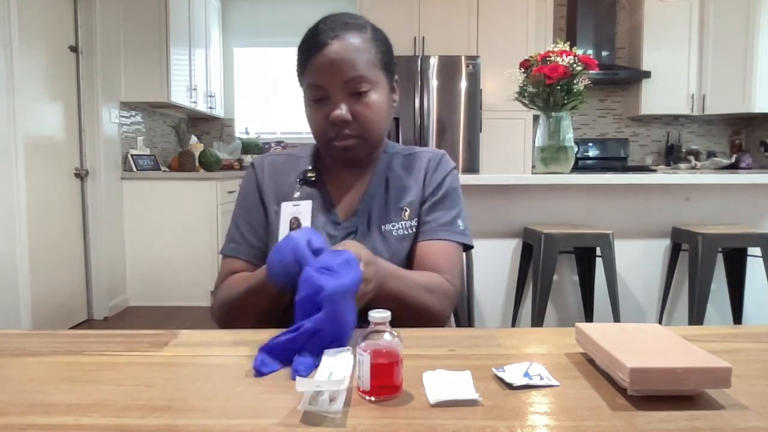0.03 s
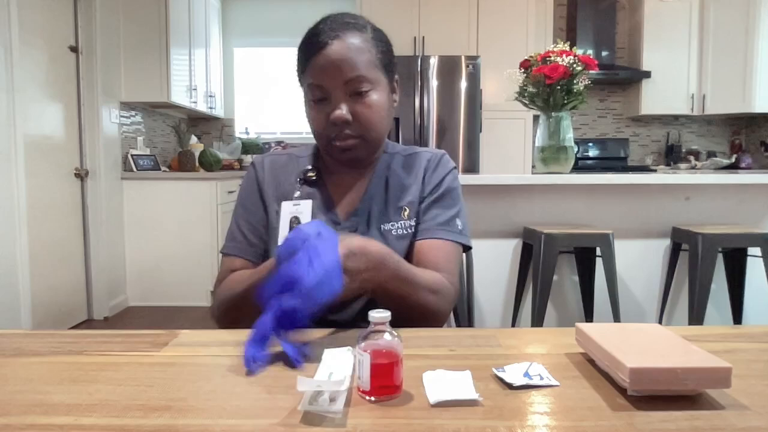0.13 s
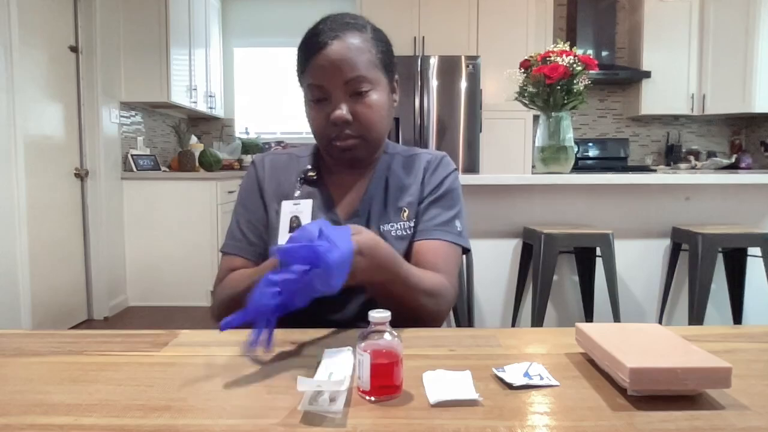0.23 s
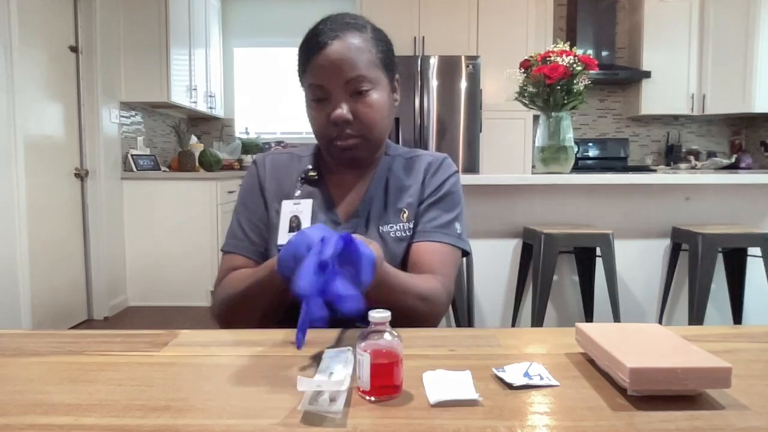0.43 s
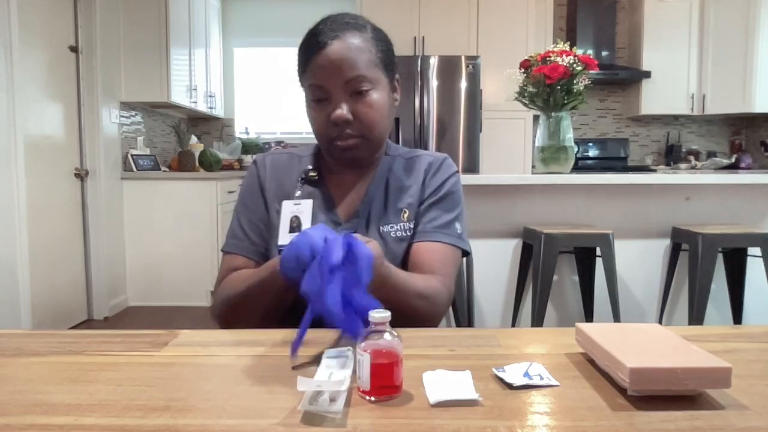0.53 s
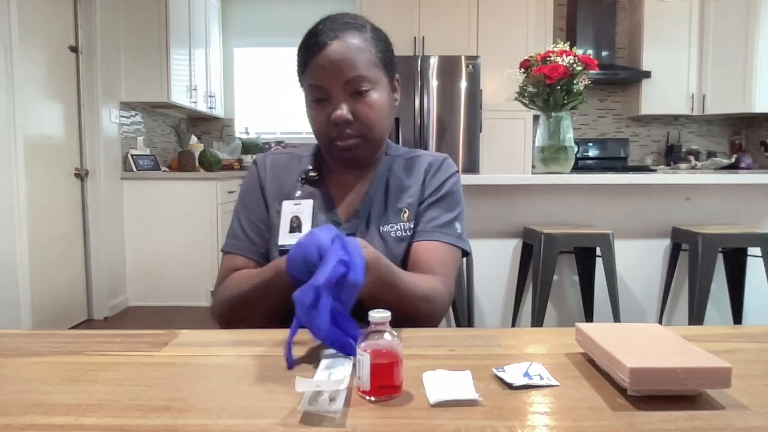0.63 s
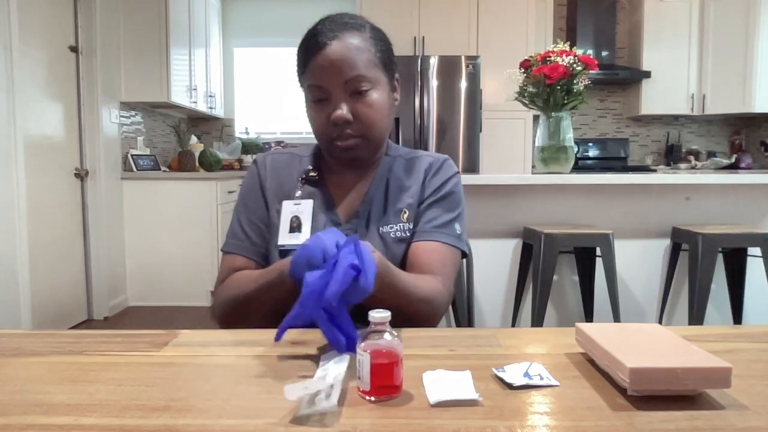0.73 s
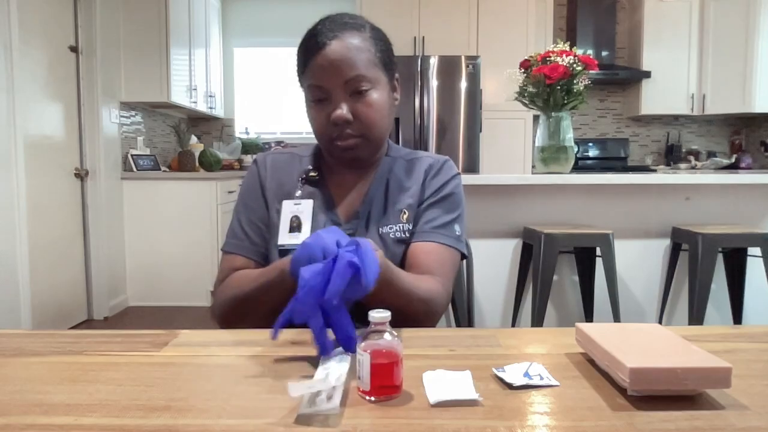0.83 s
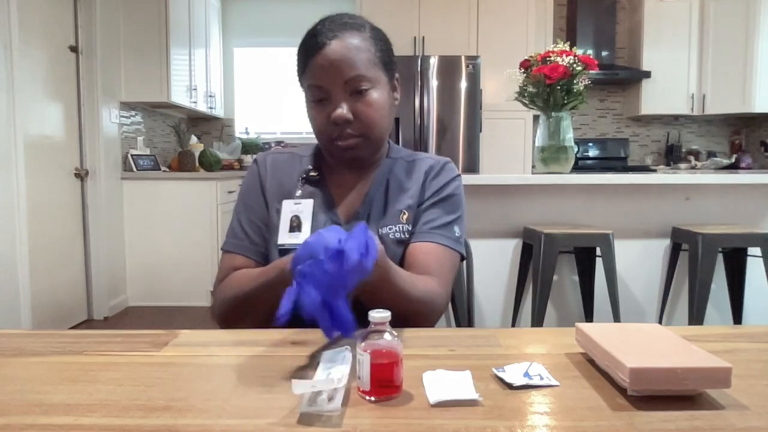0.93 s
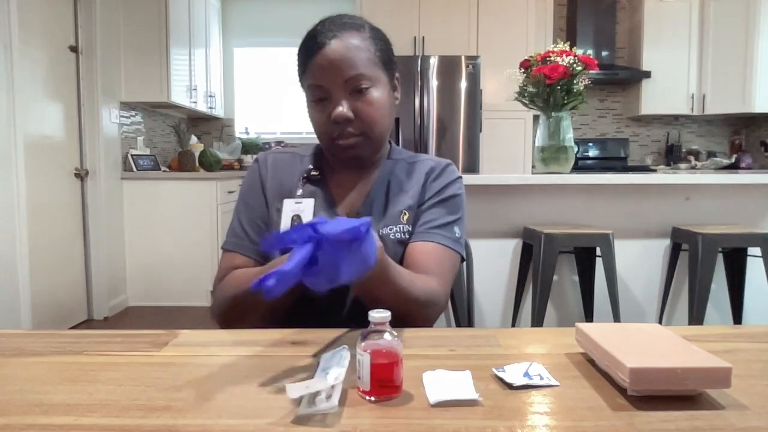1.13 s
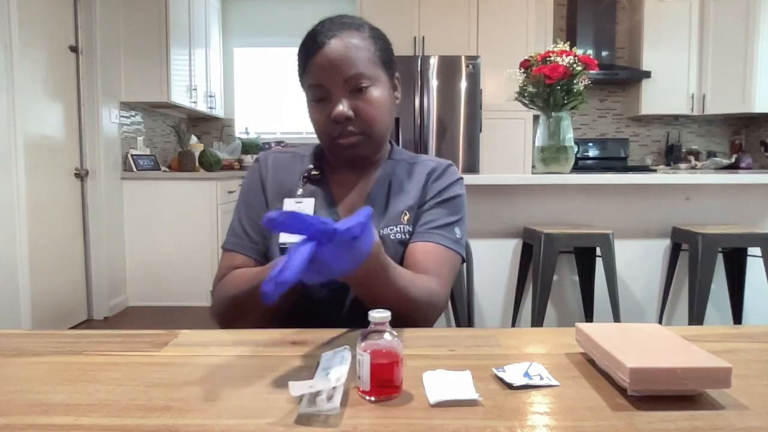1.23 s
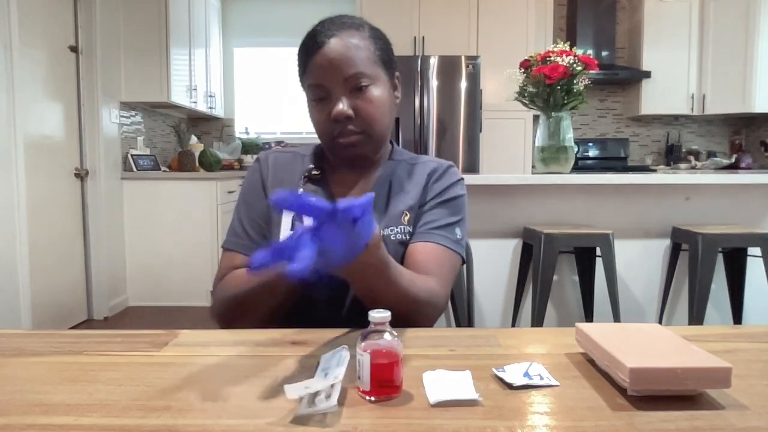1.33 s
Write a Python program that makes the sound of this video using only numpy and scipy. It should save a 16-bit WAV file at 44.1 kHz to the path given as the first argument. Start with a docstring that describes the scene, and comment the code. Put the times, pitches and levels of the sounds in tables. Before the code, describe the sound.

A thin rubber glove rustles onto a hand, with one sharp snap of the cuff.

```python
"""Thin rubber rasps on skin as a glove is worked onto a hand, over a wooden table in a quiet kitchen.
Stick-slip friction drives the film in short strokes; creases tick as they let go, taut film squeaks,
and the loose, hollow glove gives soft low flaps. The cuff snaps once against the wrist and sets the
room reverberating. A faint hum lies under it all, and a noise suppressor dulls the quiet moments."""
import sys
import numpy as np
from scipy import signal
from scipy.fft import rfft, irfft
from scipy.io import wavfile
from scipy.ndimage import uniform_filter1d

SR = 44100
rng = np.random.default_rng(int(sys.argv[2]) if len(sys.argv) > 2 else 0)


def bounce(signal):
    """Save signal as a 16-bit WAV file at the path given by the first command-line argument."""
    frames = np.transpose(np.atleast_2d(signal))
    limited = np.clip(frames, -1, 1)
    pcm = np.round(limited * 32767).astype(np.int16)
    wavfile.write(sys.argv[1], SR, pcm)


N = 61739
T, HZ = np.arange(N) / SR, np.fft.rfftfreq(N, 1 / SR)

# rubbing strokes: full_at_s, rise_s, hold_s, fall_s, level_db, body_db, ring_db, fizz_db
# (the last three relative to level_db)
RUB_STROKES = [ (.006, 0.036, 0.0094, 0.041, -59.5, -3, 0, -18),
               (0.032, 0.013, 0.0063, 0.39, -66.5, 0, 0, -11),
               (0.201, 0.027, 0.022, .02, -73.5, -5.5, -2, -1.5),
               (0.223, 0.0021, 0.045, 0.083, -55.5, 0, 0, -10.5),
               (0.284, 0.022, 0.024, 0.11, -56, 2, -3, -33),
               (0.372, 0.017, 0.021, 0.16, -64, -10.5, -3, -5.5),
               (0.538, 0.022, 0.0092, 0.045, -74, 3, 10.5, -24),
               (0.551, 0.017, 0.0059, 0.027, -82.5, 9.5, -10, 6),
               (0.654, 0.045, 0.028, 0.028, -88, 1, 12, -12),
               (0.702, 0.022, 0.044, 0.013, -61.5, -13.5, -8, -5.5),
               (0.766, 0.075, 0.11, 0.14, -66, -8.5, -5, -8.5),
               (0.992, 0.017, 0.025, 0.017, -73.5, -2.5, 18, -13),
               (1.005, 0.015, 0.031, 0.055, -57, -10.5, -6.5, -7),
               (1.082, 0.027, 0.031, 0.068, -87, 9, 14, 7.5),
               (1.184, 0.016, 0.047, 0.042, -74, -12, -5.5, 0.5),
               (1.259, 0.061, 0.032, 0.094, -88, 14.5, 15, -26),
               (1.345, 0.046, 0.023, 0.093, -68.5, -2, 8.5, -6.5)]
# low, middle and high spectra of the rubbed film: frequency_hz, gain_db
BODY_SPECTRUM = [(60, -35), (250, -16), (430, 8), (620, 7.5), (850, 3.5), (1250, 3), (1600, -5),
                 (2400, -59), (6000, -75.5)]
RASP_SPECTRUM = [(600, -50), (1600, -16), (2400, 0), (2700, -11.5), (3050, 4.5), (3400, -0.5), (3780, 4),
                 (4080, -7), (4450, 6.5), (4850, 3), (5400, -3), (6200, -2), (6800, -4), (7400, -24),
                 (12000, -55.5)]
FIZZ_SPECTRUM = [(2000, -64), (6000, -20.5), (7500, 3.5), (9500, 4), (11000, 7), (12500, 5), (15500, 4)]
# creases letting go: start_s, length_s, level_db, tilt_db_per_octave, cutoff_hz, fold_pitch_hz
CREASE_TICKS = [(.0096, 0.0039, -50.5, 2, 5360, 4800), (.163, 0.0036, -57, 10.5, 11000, 6200),
                (0.2257, 0.0025, -44.5, -7, 6030, 900), (0.2623, 0.002, -43.5, -1.5, 12000, 3130),
                (0.381, 0.0014, -39.5, -0.5, 8000, 6240), (0.3968, 0.0017, -44, 4, 6200, 2420),
                (0.5421, 0.0031, -54, -5, 6500, 1317), (0.6945, 0.0033, -50.5, 3.5, 9660, 1800),
                (.7190, 0.0047, -45, 0.5, 11900, 3800), (0.7211, 0.0037, -46.5, 4.5, 12100, 1960),
                (.7394, 0.0023, -44.5, -4, 5000, 1380), (0.845, 0.0034, -63.5, 6, 13700, 11400),
                (1.3532, 0.00026, -35, 1, 4600, 2490)]
# spectrum of a crease: frequency_hz, gain_db
CREASE_SPECTRUM = [(100, -20.5), (700, -8), (1500, -7.5), (2150, 11.5), (2750, -5), (3600, 1), (4050, -3.5),
                   (4550, 5.5), (5500, -4), (7600, -5.5), (11000, -8.5), (15500, -30.5)]
# reflections from the table and the body: delay_s, gain_db
EARLY_ECHOES = [(.0058, -16.5), (.0104, -12.5)]
# taut film singing: middle_s, length_s, pitch_hz, width_hz, level_db, glide_hz_per_s
FILM_SQUEAKS = [(0.02, 0.055, 2910, 454, -56, -3000), (0.043, 0.05, 1087, 305, -60.5, -1500),
                (0.237, 0.013, 850, 335, -45.5, -5000), (.335, 0.036, 840, 221, -54, -1000),
                (0.337, 0.031, 2010, 200.7, -53.5, 1997.5), (0.487, .1, 5350, 890, -67.5, -8000),
                (.68, 0.041, 1890, 330, -61.5, -6000), (0.797, 0.13, 4640, 328, -62.5, -1000),
                (0.823, .11, 3270, 170, -68.5, -5000), (.982, 0.0047, 2280, 610, -54, -9000),
                (1.014, 0.045, 3620, 328, -56, 2000), (1.131, 0.098, 1810, 700, -66, -7000),
                (1.19, 0.25, 3780, 260, -76, -900), (1.231, 0.084, 4570, 260, -74.5, -1500),
                (1.369, 0.097, 4480, 280, -65.5, 2000)]
# flaps of the hollow glove: middle_s, length_s, pitch_hz, width_hz, level_db
GLOVE_FLAPS = [(0.039, 0.066, 401, 81, -64.5), (0.203, 0.13, 204, 157, -74.5),
               (0.259, 0.033, 434, 144, -51.5), (0.272, 0.0095, 183, 124, -54),
               (0.289, 0.058, 194, 125, -49), (0.549, 0.025, 166, 173, -61.5),
               (0.594, 0.079, 533, 200, -69), (0.703, 0.049, 169.3, 90, -70),
               (0.744, 0.03, 450, 267, -58.5), (0.774, 0.04, 352, 112, -62), (0.859, 0.061, 220, 56.4, -59),
               (0.801, 0.096, 153, 80.6, -70), (0.93, .02, 208, 95, -71), (1.029, 0.055, 205, 180, -56.5),
               (1.08, 0.039, 266, 70, -63), (1.121, 0.057, 220, 108, -59.5), (1.121, 0.11, 380, 192, -66.5),
               (1.163, 0.14, 606, 88, -69), (1.18, 0.048, 452, 70, -64), (1.3, 0.2, 603, 43, -70),
               (1.377, 0.16, 283, 270, -66.5)]
# spectrum of the cuff's crack: frequency_hz, gain_db
CRACK_SPECTRUM = [(60, -50.5), (200, -9.5), (500, -33), (800, 2.5), (1200, -2.5), (1600, -2), (2200, 1),
                  (2650, 7.5), (3200, 5), (3700, 4.5), (4050, -1), (4600, -2), (5400, -1), (6100, -2),
                  (7000, -14.5), (9600, -20), (11000, -13), (12500, -22.5), (15500, -31)]
# smaller slaps after the crack: delay_s, gain_db
CUFF_SLAPS = [(.00075, -6.5), (.0017, -14.5), (.0042, -15.5), (.0078, -15)]
# the kitchen's reverberation time: frequency_hz, t60_s
ROOM_DECAY = [(100, 0.37), (300, 0.32), (900, 0.39), (2100, 0.56), (6000, 0.51), (10000, 0.39),
              (16000, 0.18)]
# starting spectrum of the reverberation: frequency_hz, gain_db
ROOM_SPECTRUM = [(100, 3), (500, -6.5), (1000, 6), (1450, -6), (2050, 1), (2700, -23), (3300, -9.5),
                 (4500, -8), (6000, 2), (7500, 5), (11000, 0), (16000, 3.5)]
# spectrum of the still air: frequency_hz, gain_db
AIR_SPECTRUM = [(20, -4), (55, -21), (90, -0.5), (140, -6), (250, 8.5), (600, -9.5), (1200, -15.5),
                (4000, -25), (8000, -21.5), (16000, -14)]

BAND_LIMIT_HZ = 15900


def amp(db):
    """Decibels to amplitude ratio."""
    return 10 ** (np.asarray(db) / 20)


def unit(x):
    """Normalises to rms 1."""
    return x / np.sqrt(np.mean(x ** 2) + 1e-20)


def read(points, hz):
    """Interpolates a table on a log-frequency axis."""
    frequency, value = np.transpose(points)
    return np.interp(np.log(hz + 1), np.log(frequency + 1), value)


def add(mix, start_s, sound):
    """Superposes a sound on the mix."""
    part = mix[max(round(start_s * SR), 0):][:len(sound)]
    part += sound[:len(part)]


def shaped(x, gain):
    """Filters by a gain per frequency, to rms 1."""
    return unit(irfft(rfft(x) * gain, N))


def resonance(pitch_hz, width_hz):
    """Lorentzian response of a resonance."""
    return 1 / (1 + ((HZ - pitch_hz) / (width_hz / 2)) ** 2)


def click(spectrum, tilt_db=0, size=2048):
    """Minimum-phase impulse response of a spectrum, with energy 1."""
    hz = abs(np.fft.fftfreq(size, 1 / SR))
    log_gain = np.log(amp(read(spectrum, hz) + tilt_db * np.log2(np.clip(hz, 500, 9000))))
    response = np.exp(np.conj(signal.hilbert(log_gain)))
    pulse = np.fft.ifft(response).real[:size // 2]
    return pulse / np.linalg.norm(pulse)


def friction(slips_per_s=4300, spread_db=5.5, slide_share=0.65):
    """Stick-slip friction: random impulses of uneven size over the noise of smooth sliding."""
    sizes = amp(spread_db * np.minimum(rng.exponential(1, N), 4))
    slips = sizes * rng.choice([-1, 1], N) * (rng.random(N) < slips_per_s / SR)
    return (1 - slide_share) * unit(slips) + slide_share * rng.standard_normal(N)


def rubbing():
    """Forced vibration: friction drives the film's resonances in strokes that swell, hold and die."""
    drive, out = friction(), np.zeros(N)
    body, rasp, fizz = (shaped(drive, amp(read(spectrum, HZ)))
                        for spectrum in (BODY_SPECTRUM, RASP_SPECTRUM, FIZZ_SPECTRUM))
    ring = shaped(drive, resonance(pitch_hz=2143, width_hz=560))
    for full_at_s, rise_s, hold_s, fall_s, level_db, body_db, ring_db, fizz_db in RUB_STROKES:
        drop_db = 20 * (np.maximum(full_at_s - T, 0) / rise_s
                        + np.maximum(T - full_at_s - hold_s, 0) / fall_s)
        film = rasp + amp(body_db) * body + amp(ring_db) * ring + amp(fizz_db) * fizz
        out += amp(level_db - drop_db) * film
    return out


def background(air_db=-79, hum_db=-79, hum_hz=120):
    """Ambient noise floor: broadband air and the pure tone of an appliance's hum."""
    air = shaped(rng.standard_normal(N), amp(read(AIR_SPECTRUM, HZ)))
    hum = unit(np.sin(2 * np.pi * hum_hz * T))
    return amp(air_db) * air + amp(hum_db) * hum


def creases(fold_db=10.5, fold_width_hz=230):
    """Transient excitation: a crease lets go in one slip and a burst of smaller ones, ringing its fold."""
    out, t = np.zeros(N), T[:1024]
    first_slip = 4 * (t == 0)
    for start_s, length_s, level_db, tilt_db, cutoff_hz, fold_hz in CREASE_TICKS:
        slips = first_slip + rng.standard_normal(len(t)) * np.exp(-(t / length_s) ** 2)
        burst = np.convolve(slips, click(CREASE_SPECTRUM, tilt_db))
        fold = signal.lfilter(*signal.iirpeak(fold_hz, fold_hz / fold_width_hz, fs=SR), burst)
        burst += (amp(fold_db) - 1) * fold
        softness = signal.butter(4, cutoff_hz, fs=SR, output="sos")  # soft folds lack the top
        tick = signal.sosfilt(softness, burst)
        add(out, start_s, amp(level_db) * np.sqrt(length_s * SR) * tick / np.linalg.norm(tick))
    return out


def swell(middle_s, length_s, pitch_hz, width_hz, level_db, glide_hz_per_s=0):
    """A noise-driven resonance under a Gaussian envelope, with an optional linear glide."""
    envelope = np.exp(-(2 * (T - middle_s) / length_s) ** 2)
    band = signal.hilbert(shaped(rng.standard_normal(N), resonance(pitch_hz, width_hz)))
    glide = np.exp(1j * np.pi * glide_hz_per_s * (T - middle_s) ** 2)
    sound = envelope * (band * glide).real
    return amp(level_db) * sound * np.linalg.norm(envelope) / np.linalg.norm(sound)


def squeaks():
    """Tension sets pitch: sliding film sings higher as it tightens and lower as it slackens."""
    return sum(swell(*row) for row in FILM_SQUEAKS)


def flaps():
    """Damped resonance: the loose, hollow glove folds with soft low puffs."""
    return sum(swell(*row) for row in GLOVE_FLAPS)


def cuff_snap(start_s=0.2665, crack_db=-3, ring_hz=780, ring_t60_s=0.052, ring_db=-37.5):
    """Impact and free decay: the stretched cuff hits the wrist with a crack, slaps and a short ring."""
    out, crack = np.zeros(N), amp(crack_db) * click(CRACK_SPECTRUM)
    add(out, start_s, -crack)
    for delay_s, gain_db in CUFF_SLAPS:
        add(out, start_s + delay_s, amp(gain_db) * crack)
    add(out, start_s, amp(ring_db - 60 * T / ring_t60_s) * np.sin(2 * np.pi * ring_hz * T))
    return out


def reflected(direct):
    """Comb filtering: early echoes from nearby surfaces interfere with the direct sound."""
    out = direct.copy()
    for delay_s, gain_db in EARLY_ECHOES:
        add(out, delay_s, amp(gain_db) * direct)
    return out


def reverberation(sound, build_s=0.00043):
    """The kitchen's diffuse field decays exponentially, each band at its own rate."""
    hz, t, bands = signal.stft(rng.standard_normal(N), SR, nperseg=256)
    decay_db = 60 * t / read(ROOM_DECAY, hz)[:, None]
    bands *= amp(read(ROOM_SPECTRUM, hz)[:, None] - decay_db)
    tail = signal.istft(bands, SR)[1][:N] * (1 - np.exp(-T / build_s))
    return signal.fftconvolve(sound, tail / np.linalg.norm(tail))[:N]


def scene():
    """Superposition of glove, room and background, alike in both channels."""
    handling = reflected(rubbing() + creases()) + flaps() + squeaks()
    cuff = cuff_snap()
    room = reverberation(amp(-12.5) * handling + amp(-6.5) * cuff)
    mono = handling + cuff + room + background()
    return np.array([mono, mono])


def record(dry):
    """Downward expansion turns quiet treble down further; a low cut and a band limit follow."""
    split_hz, threshold_db, slope_db_per_db, low_cut_hz = 700, -61, 0.7, 71
    treble = signal.sosfiltfilt(signal.butter(2, split_hz, "high", fs=SR, output="sos"), dry)
    power = uniform_filter1d((treble ** 2).mean(0), size=900)
    level_db = 10 * np.log10(abs(power) + 1e-14)
    gain = amp(slope_db_per_db * np.clip(level_db - threshold_db, -12, 0))
    out = dry - treble + gain * treble
    out = signal.sosfilt(signal.butter(1, low_cut_hz, "high", fs=SR, output="sos"), out)
    band_limit = signal.firwin(511, BAND_LIMIT_HZ, window=("kaiser", 9), fs=SR)
    return signal.oaconvolve(out, band_limit[None], "same")


dry = scene()
out = record(dry)
bounce(out)
```